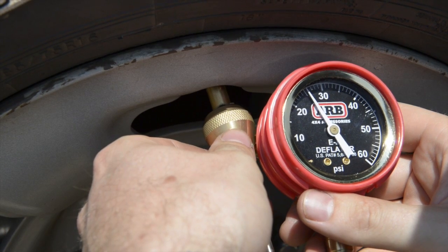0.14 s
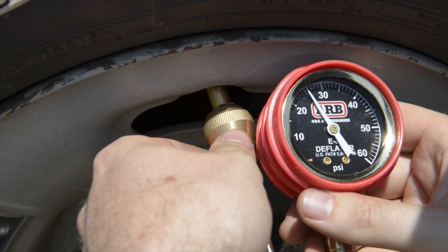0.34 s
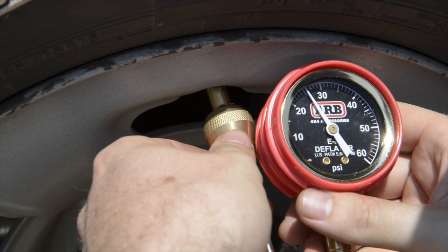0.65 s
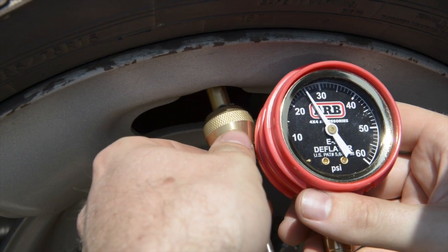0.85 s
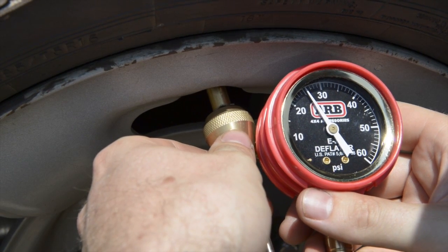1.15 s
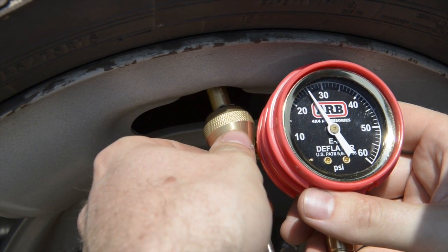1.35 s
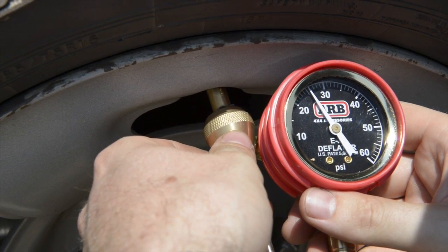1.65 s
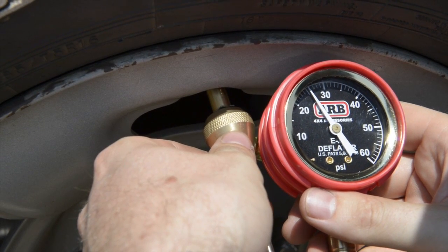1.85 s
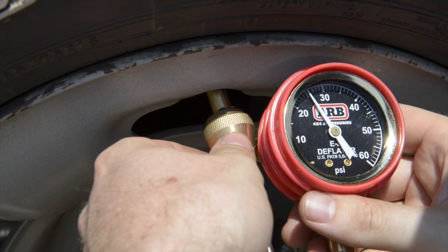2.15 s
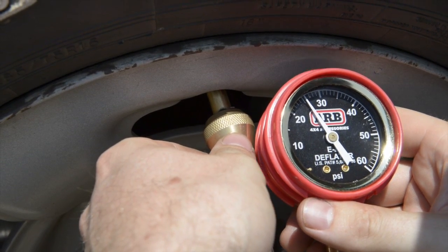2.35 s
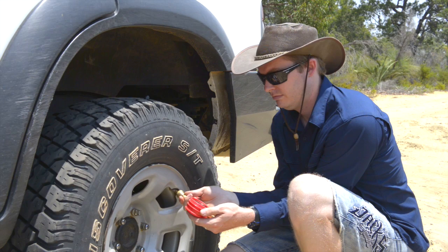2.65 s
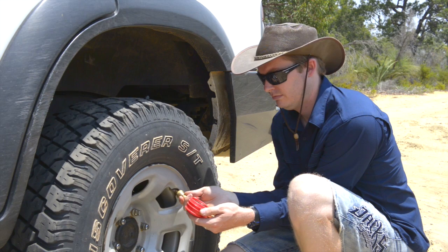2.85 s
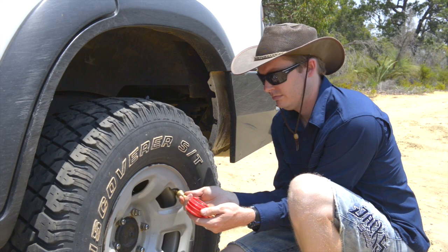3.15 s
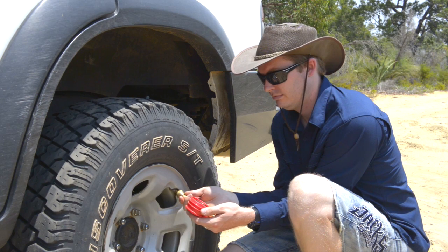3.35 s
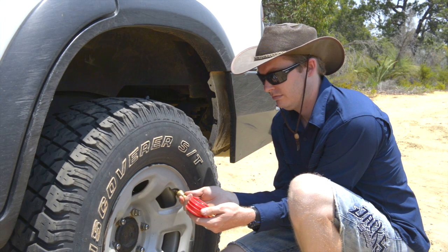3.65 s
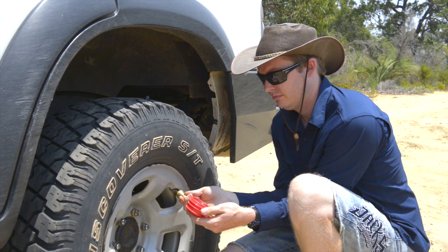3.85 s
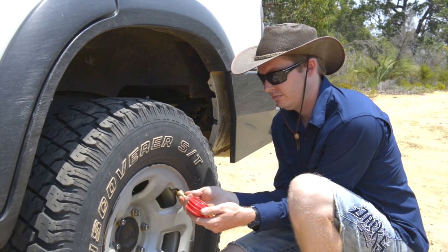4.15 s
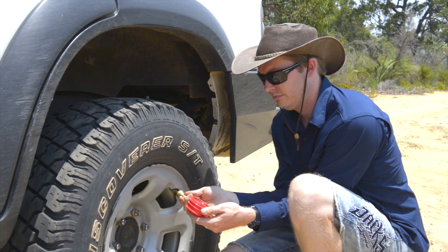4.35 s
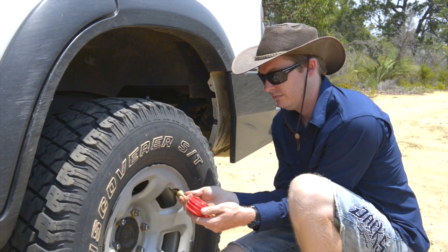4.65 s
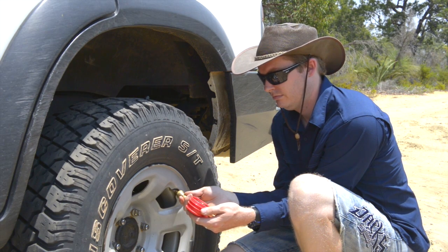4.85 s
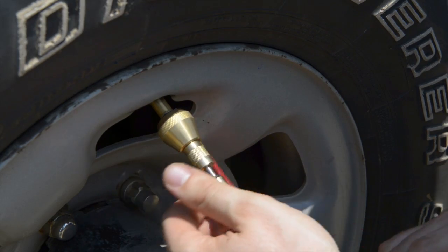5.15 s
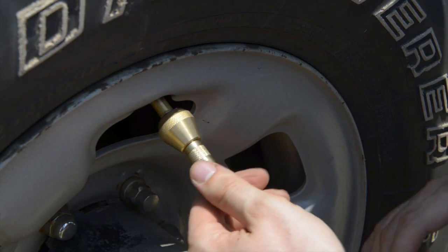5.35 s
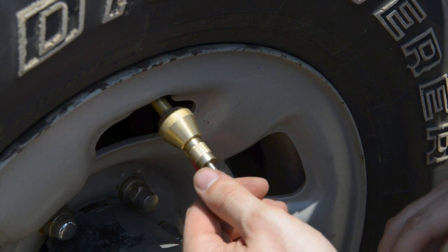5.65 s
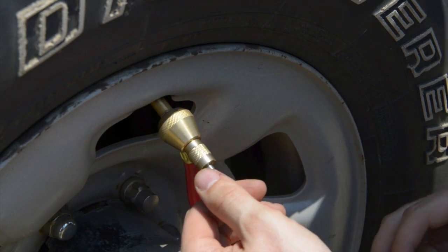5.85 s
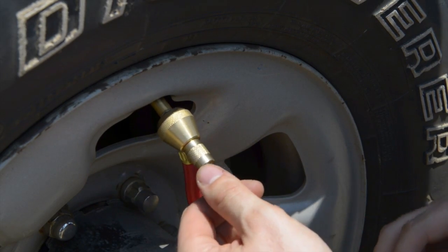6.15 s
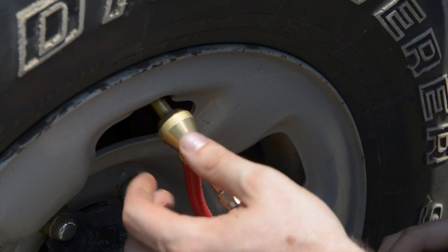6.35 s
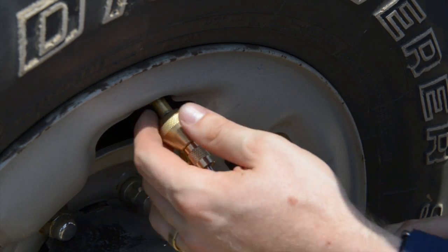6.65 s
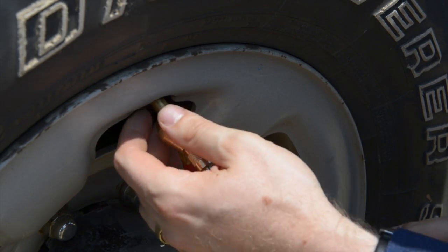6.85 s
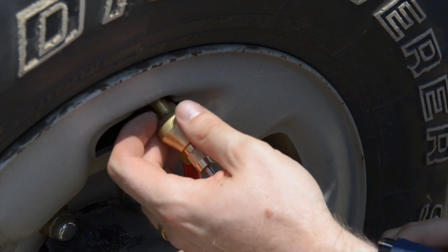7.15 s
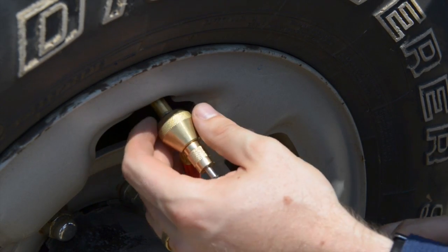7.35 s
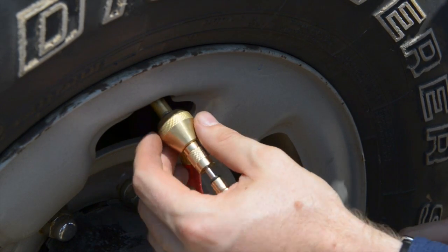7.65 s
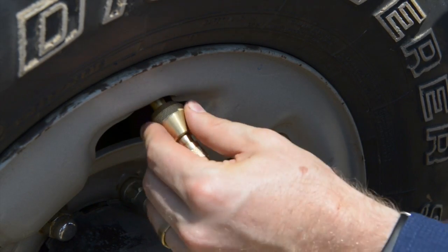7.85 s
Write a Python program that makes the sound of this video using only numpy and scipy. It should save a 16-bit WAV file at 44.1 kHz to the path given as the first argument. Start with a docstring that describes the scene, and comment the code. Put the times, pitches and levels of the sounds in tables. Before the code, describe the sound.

Outdoors, close to a wheel, a tyre deflator lets out a loud, even, high hiss of air from the very start. Light gusts bump the microphone underneath, along with a quiet open-air rumble. Near the end the deflator is closed: the hiss spurts briefly and cuts off, leaving a very faint ring from the steel rim and the quiet background.

```python
"""A loud, close hiss of air leaving a tyre through a hand-held deflator.
The turbulent jet rings the valve body and wheel dish, spurts as the collar slides shut, and stops.
The steel rim rings faintly. A light breeze buffets the microphone over a quiet outdoor rumble."""
import sys
import numpy as np
from scipy import signal
from scipy.fft import rfft, irfft
from scipy.io import wavfile

SR = 44100
rng = np.random.default_rng(int(sys.argv[2]) if len(sys.argv) > 2 else 0)


def store_pcm(level_fs):
    """Save levels as 16-bit WAV."""
    pcm = np.round(np.clip(level_fs, -1, 1) * 32767).astype(np.int16)
    wavfile.write(sys.argv[1], SR, np.atleast_2d(pcm).T)


N = 353461
TIME_S = np.arange(N) / SR
FREQ_HZ = np.fft.rfftfreq(N, 1 / SR)


def hiss(gain_db=0.68):
    """Air jet, coloured by the cavities round the valve and combed by near echoes."""
    # jet strength, valve open: (time [s], relative level [dB])
    flow = [(0.0, -14.5), (0.04, -15.5), (7.4, -15.5), (7.64, -16), (7.84, -15)]
    # collar slides shut, last spurt, seal: (time [s], relative level [dB])
    shut = [(7.872, -16.5), (7.896, -12), (7.915, -20.5), (7.93, -29), (7.942, -50), (7.96, -75)]
    # broad jet spectrum: (frequency [Hz], relative level [dB])
    spectrum = [(250, -39), (480, -32.0), (540, -25.5), (600, -14.9), (800, -18.9), (1200, -17.7),
                (1600, -13.1), (2500, -11.9), (3500, -9.8), (4900, -11.4), (8000, -9.6), (10800, 0.0),
                (12900, -4.5), (15600, -8.8)]
    # wheel dish, cupped hand, brass valve body: (frequency [Hz], width [Hz], lift [dB])
    resonances = [(660, 60, 2.5), (915, 70, 7.6), (1345, 120, 5.4), (1680, 110, 5.3), (1870, 160, 2.9),
                  (2295, 130, 6.3), (2470, 240, 5.3), (2975, 180, 2.7), (3260, 140, 3.7), (3490, 170, 6.7),
                  (4115, 190, 2.8), (4460, 130, 3.3), (5135, 150, 3.1), (6005, 640, 5.4), (6660, 240, 6.3),
                  (7015, 150, 4.0), (7320, 200, 4.9), (7530, 220, 5.4), (7925, 150, 3.4), (8400, 470, 4.9),
                  (8940, 140, 4.6), (9345, 240, 5.1), (10765, 200, 1.0), (11130, 230, 1.3),
                  (12300, 310, 3.0), (12880, 440, 3.1), (13925, 250, 2.9), (14725, 220, 2.7)]
    # off wheel dish and ground: (delay [s], gain [dB])
    echoes = [(.005228, -25), (.007792, -26)]
    body_db = slope(spectrum)
    for hz, width_hz, lift_db in resonances:
        body_db += lift_db * np.exp(-(2 * (FREQ_HZ - hz) / width_hz) ** 2)
    comb = 1 + sum(undb(db) * np.exp(-2j * np.pi * FREQ_HZ * delay_s) for delay_s, db in echoes)
    jet = colour(turbulence(), body_db + 20 * np.log10(np.abs(comb)))
    flow_db = np.interp(TIME_S, *np.vstack([flow, shut]).T)
    return jet * undb(gain_db + flow_db)


def turbulence(flutter_db=0.31, flutter_hz=20, sway_db=0.41, sway_hz=5, crackle_db=0.2, crackle_hz=900):
    """Jet noise: eddies of four sizes sway independently; the whole flutters and crackles."""
    source = rfft(noise())
    centres_hz = [1000, 3000, 7000, 12000]
    eddies = 0
    for one_band in np.eye(len(centres_hz)):
        share = np.interp(np.log(FREQ_HZ + 1), np.log(centres_hz), one_band)
        eddies += irfft(source * share, N) * undb(sway_db * walk(sway_hz))
    return eddies * undb(flutter_db * walk(flutter_hz) + crackle_db * walk(crackle_hz))


def rim(jet, mode_hz=1670, t60_s=0.6, level_db=-59):
    """One lightly damped mode of the steel rim, driven by the jet; lingers when the air stops."""
    pole = np.exp((2j * np.pi * mode_hz - np.log(1000) / t60_s) / SR)
    ring = signal.lfilter([1], [1, -pole], jet).imag
    return ring / ring.std() * undb(level_db)


def breeze(gain_db=-1.5, churn_db=2, churn_hz=18):
    """Low churning pressure on the microphone, following the gusts."""
    # wind spectrum: (frequency [Hz], relative level [dB])
    spectrum = [(20, -20), (50, 0), (95, 1.5), (170, -12.5), (300, -25.5), (600, -35), (1500, -65)]
    return colour(noise(), slope(spectrum)) * gusts() * undb(gain_db + churn_db * walk(churn_hz))


def buffets(level_db=-35, reference_gust_db=-33, exponent=1.8):
    """Fast eddies thump at strong gust crests, brighter than the breeze."""
    # thump spectrum: (frequency [Hz], relative level [dB])
    spectrum = [(20, -22), (60, -8), (110, 2), (250, -8), (400, -16.5), (700, -46), (1500, -60)]
    push = (gusts() / undb(reference_gust_db)) ** exponent
    return undb(level_db) * push * colour(noise(), slope(spectrum))


def gusts(fall_s=0.053):
    """Wind pressure envelope: each gust builds to a crest and collapses quickly."""
    # gusts on the microphone: (crest time [s], rise [s], relative level [dB])
    crests = [(.59, .04, -43.5), (.72, .04, -43), (.92, .06, -39), (1.11, 0.068, -39), (1.39, 0.14, -39),
              (1.53, 0.039, -32.5), (1.82, 0.043, -46), (2.03, 0.1, -40.5), (2.37, 0.15, -35),
              (2.56, .05, -46), (2.85, 0.15, -42.5), (3.07, 0.12, -45), (3.475, 0.046, -41),
              (3.98, 0.14, -41.5), (4.19, .06, -48), (4.63, .08, -44), (5.13, .04, -49)]
    pressure = 0
    for crest_s, rise_s, db in crests:
        width_s = np.where(TIME_S < crest_s, rise_s, fall_s)
        pressure += undb(db) * np.exp(-((TIME_S - crest_s) / width_s) ** 2)
    return pressure


def outdoors(level_db=-50):
    """Quiet open-air rumble with a thin hiss."""
    # open-air spectrum: (frequency [Hz], relative level [dB])
    spectrum = [(20, -6.5), (55, 3), (110, -2.5), (190, -1), (300, -7), (420, -2.5), (520, -19),
                (1200, -15), (1700, -20), (2200, -17), (4500, -21), (10000, -17), (15000, -31)]
    return colour(noise(), slope(spectrum)) * undb(level_db)


def undb(db):
    """Decibels to gain."""
    return 10 ** (np.asarray(db) / 20)


def slope(points):
    """Join (frequency [Hz], level [dB]) points on a log-frequency axis."""
    hz, db = np.transpose(points)
    return np.interp(np.log(FREQ_HZ + 1), np.log(hz), db)


def colour(x, response_db):
    """Filter, then scale to rms 1."""
    filtered = irfft(rfft(x) * undb(response_db), N)
    return filtered / filtered.std()


def noise():
    """White noise."""
    return rng.standard_normal(N)


def walk(rate_hz):
    """Random drift with spread 1, rolling off above rate_hz."""
    return colour(noise(), -10 * np.log10(1 + (FREQ_HZ / rate_hz) ** 4))


def scene():
    """Jet, rim, wind and background, the same in both channels."""
    jet = hiss()
    return np.tile(jet + rim(jet) + breeze() + buffets() + outdoors(), (2, 1))


def record(dry):
    """Steep elliptic low-pass."""
    cutoff_hz = 15750
    return signal.sosfilt(signal.ellip(12, 0.1, 90, cutoff_hz, fs=SR, output="sos"), dry)


dry = scene()
out = record(dry)
store_pcm(out)
```